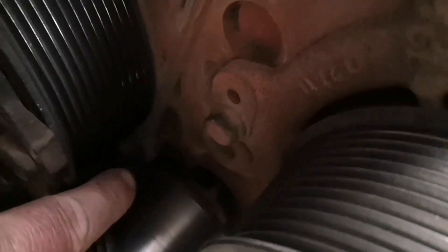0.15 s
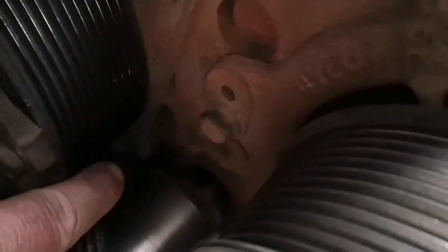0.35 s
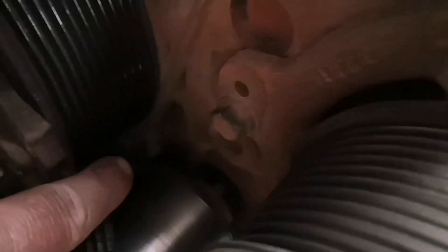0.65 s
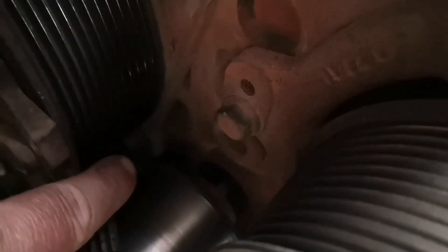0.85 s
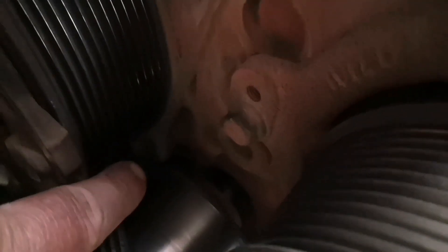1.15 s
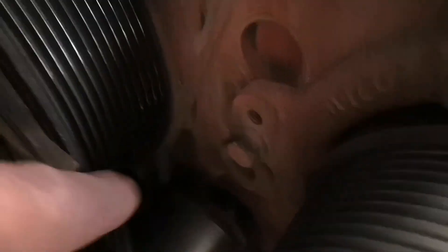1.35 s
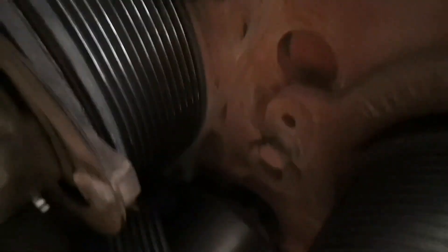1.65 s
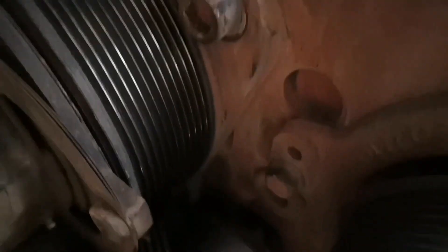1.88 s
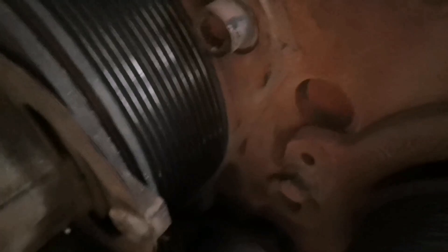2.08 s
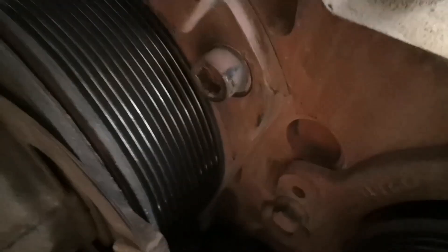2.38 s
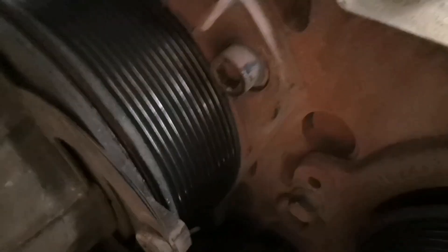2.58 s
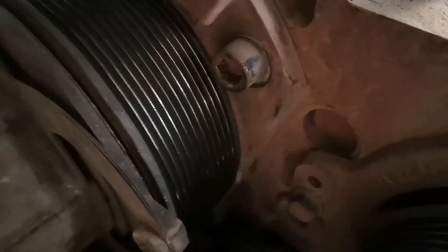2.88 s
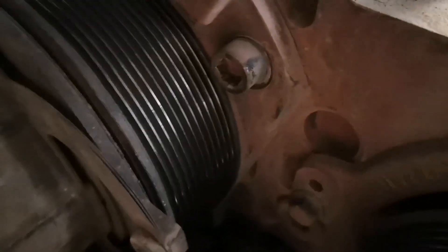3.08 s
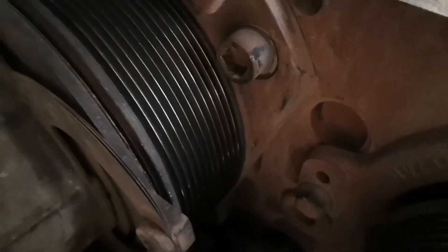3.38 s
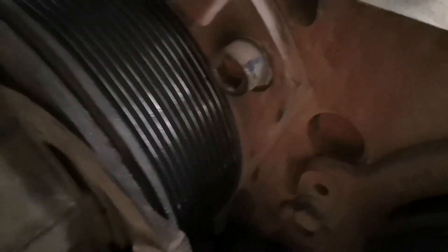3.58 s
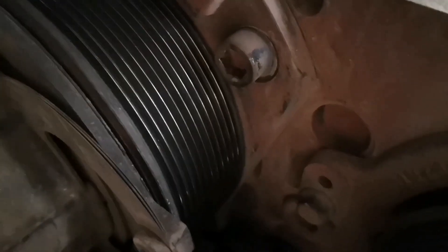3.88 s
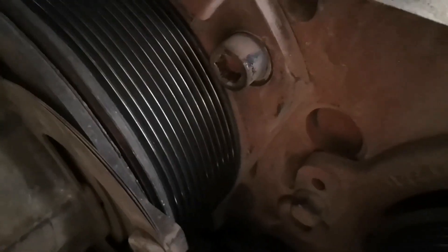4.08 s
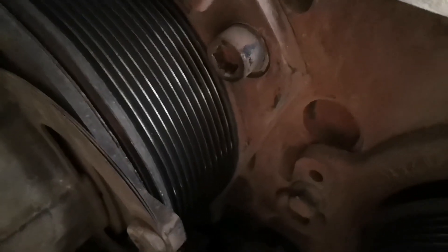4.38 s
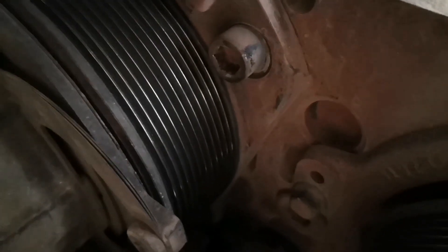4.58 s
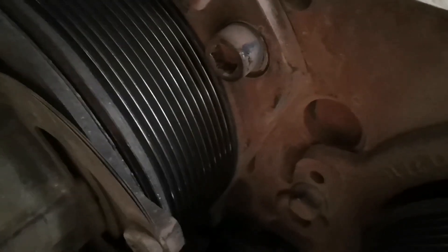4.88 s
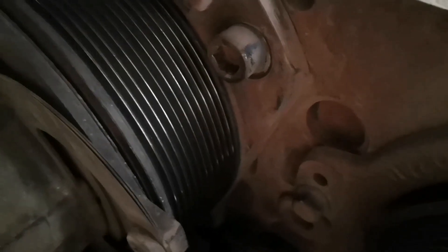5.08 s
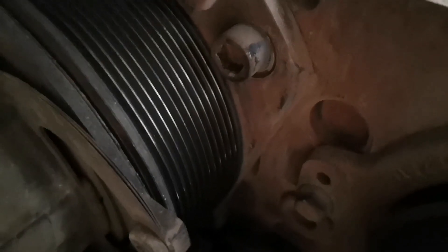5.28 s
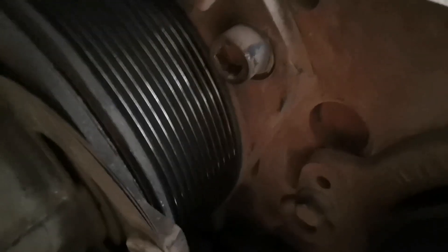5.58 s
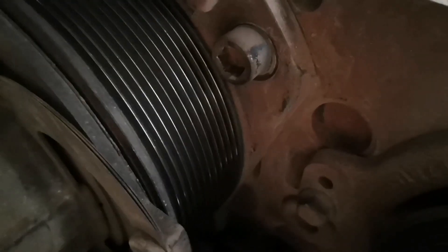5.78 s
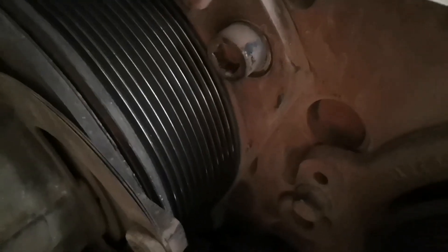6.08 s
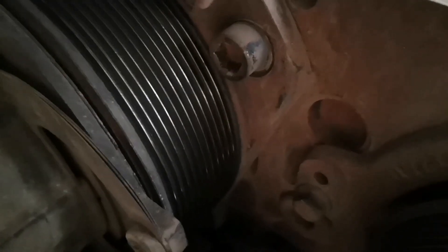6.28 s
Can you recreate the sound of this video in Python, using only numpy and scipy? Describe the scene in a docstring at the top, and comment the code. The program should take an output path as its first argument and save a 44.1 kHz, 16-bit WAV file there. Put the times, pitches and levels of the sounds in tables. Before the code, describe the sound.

Hard steel socket clacks and loose metallic rattles near the right, over low engine hum and wavering road rumble in a workshop.

```python
"""Socket and wrench on engine bolts

A steel socket and wrench, worked by hand close to the right of two microphone ports, clack, rattle and scuff.
Contact forces excite damped modes and a broad crack; band noise gives the dull thuds of the casting.
A hand slides on the metal and rustles as flickering noise; engine bay and shop answer with decaying noise tails.
Wavering tones make the drones and the far engine notes, which glide in pitch and stop after 3.5 s;
coloured noise makes road rumble and air.
"""
import sys
import numpy as np
from scipy import signal
from scipy.fft import rfft, irfft
from scipy.io import wavfile
from scipy.ndimage import uniform_filter1d

SR = 44100
rng = np.random.default_rng(int(sys.argv[2]) if len(sys.argv) > 2 else 0)


def store_pcm(level_fs):
    """Save levels as 16-bit WAV."""
    pcm = np.round(np.clip(level_fs, -1, 1) * 32767).astype(np.int16)
    wavfile.write(sys.argv[1], SR, np.atleast_2d(pcm).T)


def decibels_to_gain(level_db):
    """Convert a level in decibels to a linear amplitude gain (20 dB per decade)."""
    exponent = np.asarray(level_db, float) / 20
    return 10 ** exponent


N = 284134
TIME = np.arange(N) / SR

# Clacks of the socket seating on a bolt, and duller low knocks of the tool:
# [t/s, level/dB, contact colour at 1 kHz/dB, at 3.7 kHz/dB, at 6.5 kHz/dB]
CLACKS = [(0.683, 0, -8.5, -3, -4.5), (0.8042, -26, 9, -11, -36), (1.5439, -9, -6.5, -9, -13.5),
          (2.4243, -9, -9.5, -11, -25.5), (3.906, -3.5, -11, -10.5, -18), (4.8964, -5, -9, -13.5, -16),
          (4.9316, -26, 5, -21, -21), (4.9445, -24.5, 8, -21.5, -26), (5.1234, -35.5, 11, -11, -10.5)]
# Tool rattling in its play: [t/s, level/dB, contact colour at 6.5 kHz/dB, body f/Hz]
TICKS = [(0.051, -25.5, -16.5, 2610), (0.0665, -17.5, -8, 2220), (0.0935, -30.5, -22, 2400),
         (0.116, -36.5, -9, 2290), (0.147, -29, -26, 1740), (0.3645, -26.5, -16.5, 1950),
         (0.8106, -32, -35, 1770), (1.61, -25.5, -26.5, 2120), (1.631, -17, -15.5, 2230),
         (1.6408, -14, -10, 1800), (1.6711, -20, -15.5, 1980), (1.682, -26, -18, 2070),
         (1.731, -21.5, -13, 1790), (1.74, -23, -13, 1740), (1.76, -24, -5, 2280),
         (1.7746, -15.5, -10.5, 2140), (1.8859, -26, -14.5, 1800), (1.8901, -16, -12, 2330),
         (2.2705, -40, -19.5, 2290), (2.9924, -25.5, -11.5, 2930), (3.026, -35, -12, 2160),
         (3.052, -38, -16, 2320), (3.1009, -20, -13, 2040), (3.1342, -18.5, -22, 1750),
         (3.175, -23, -23, 2000), (3.236, -27, -28, 1760), (3.2516, -33, -17, 1790),
         (3.2747, -28.5, -22, 2370), (3.288, -21.5, -10.5, 2780), (3.3036, -26, -8, 2060),
         (3.331, -20, -20.5, 2120), (3.3445, -20, -13.5, 1840), (3.36, -16.5, -6.5, 1850),
         (3.4409, -22.5, -16, 2410), (3.4522, -27, -29, 2330), (3.5017, -35, -14, 2328),
         (3.8357, -11, -7, 1830), (3.862, -20, -22, 1770), (4.0105, -24, -1, 2410),
         (4.0136, -23.5, -12, 2300), (4.0415, -23, -17.5, 1830), (4.0451, -18, -8.5, 2340),
         (4.125, -32, -13, 2380), (4.1341, -32, -12, 2400), (4.1813, -27, -13, 1920),
         (4.2056, -22, -26, 2096), (5.152, -48.5, -13.5, 2164), (5.293, -51, -42, 2326),
         (5.5014, -27, -32, 2280), (5.7471, -26, -8.5, 2390), (5.7604, -26, -17, 1840),
         (5.8304, -15, -6, 2050), (5.9072, -26.5, -17.5, 1980), (5.9202, -24.5, -14, 2220),
         (6.0296, -38, -38, 1800), (6.051, -34, -29, 1826), (6.1567, -16, -8.5, 2110),
         (6.2988, -44, -11, 2610)]
# Short slides of steel on steel: [start t/s, length t/s, level/dB]
SCUFFS = [(0.029, 0.052, -44), (0.346, 0.041, -41), (0.688, 0.024, -55), (0.78, 0.051, -48.5),
          (1.576, 0.13, -37.5), (1.612, 0.021, -48.5), (1.72, 0.076, -41.5), (1.953, 0.081, -56.5),
          (2.542, 0.077, -49), (2.996, 0.064, -48.5), (3.113, 0.02, -43.5), (3.264, .12, -39),
          (3.349, 0.024, -36.5), (3.449, 0.087, -52), (3.791, 0.099, -42), (3.817, 0.042, -35),
          (4.02, 0.057, -40), (4.171, 0.063, -39), (4.913, 0.079, -43), (5.004, 0.061, -59),
          (5.315, 0.051, -46), (5.474, 0.071, -44.5), (5.731, 0.071, -43.5), (5.901, 0.05, -49),
          (6.033, 0.028, -55), (6.142, 0.04, -34.5)]
# Modes of socket, wrench and bolt, undamped by the grip: [f/Hz, level/dB, t60/s, left minus right/dB]
RINGS = [(1040, -16, .03, -3), (1287, -15, .1, 3), (1380, -14, .06, -2), (1518, -12, .04, 0),
         (1782, -5, .04, 2), (1900, -5, .03, -2), (2056, -7, .03, 0), (2180, -4, .035, 3),
         (2320, -10.5, .16, -2), (2480, -1, .02, 0), (2700, 0, .02, 0), (2900, -3, .025, 2),
         (3150, -6, .02, 2), (3375, -4, .045, -2), (3677, -8, .09, 0), (3980, -6, .025, -2),
         (4280, -6, .035, 2), (4452, -8, .035, -2), (4825, -9, .03, 0), (5157, -6, .03, 2),
         (5500, -6, .04, -2), (5695, -7, .035, 0), (6090, -6, .03, 3), (6500, -5, .03, -3),
         (6729, -6, .035, 0), (7200, -5, .03, -3), (7450, -7, .025, 2), (8086, -9, .025, 0),
         (8600, -11, .02, 3), (9400, -12, .02, -2), (11200, -18, .02, 2), (13300, -22, .02, -2)]
# Only the first blow of a clack or knock excites the 3677 Hz mode of the bolt
LOOSE_RINGS = [ring for ring in RINGS if ring[0] != 3677]
# Spectrum of the crack radiated by a contact: [f/Hz, level/dB]
CRACK_COLOUR = [(180, -51.5), (300, -17.5), (631, -22.5), (1510, -11), (1780, -2.5), (3020, -6),
                (3280, -12), (4000, -8), (7250, -7), (14500, -25.5), (15500, -49)]
# Dull thuds of the casting under the tool, flat from f/4 to 1.5 f: [t/s, level before the envelope/dB, f/Hz]
THUDS = [(0.065, -44, 273), (0.362, -47.5, 420), (0.681, -46, 201), (1.542, -43, 161.2), (1.64, -40, 238),
         (1.774, -49, 398), (3.095, -42.5, 416), (3.359, -46, 161), (3.834, -38.5, 427),
         (3.904, -46.5, 710), (4.204, -51.5, 439), (4.896, -42, 229.4), (4.94, -44.5, 156),
         (5.747, -43.5, 686)]
# Hand sliding over the pulley: [start t/s, swell t/s, hold t/s, release t/s, level/dB]
STROKES = [(0.796, 0.134, 0.069, 0.052, -50), (1.114, 0.088, 0.073, 0.35, -46.5)]
# Spectrum of skin dragged over metal: [f/Hz, level/dB]
DRAG_COLOUR = [(71, -43), (120, -5), (235, -3), (306, -13), (662, -13), (846, -13.5), (1690, -11),
               (1950, -5), (3110, -17.5), (3890, -10.5), (4960, -16.5), (5720, -11), (11700, -24.5),
               (14300, -38.5), (15500, -49.5)]
# Spectrum of the rustling grip: [f/Hz, level/dB]
RUSTLE_COLOUR = [(1500, 6), (2300, 8), (3500, -13.5), (5000, -4.5), (7200, -3), (9000, -13.5), (15000, -19)]
# Notes of far engines, one row for each steady pull: [start t/s, end t/s, first f/Hz, last f/Hz, level/dB]
ENGINE_NOTES = [(0, 1.2, 82, 83, -52.5), (1.2, 1.6, 82, 73, -50), (0, 1.7, 63, 68, -60),
                (1.7, 3.55, 68, 79.5, -54.5)]
# Mean course of the road rumble, which swells as traffic passes: [t/s, level/dB]
RUMBLE_COURSE = [(0, -56), (.8, -55), (1.45, -46.5), (1.9, -54), (2.8, -58), (3.7, -58), (4.25, -53),
                 (4.8, -60), (5.7, -57), (6.44, -62.5)]
# Spectrum of the road rumble: [f/Hz, level/dB]
RUMBLE_COLOUR = [(25, -21), (45, -2), (65, 9), (90, 3), (130, -9), (300, -42.5)]
# Steady wavering drones of the shop: [f/Hz, level/dB]
DRONES = [(84, -74.5), (133, -76.5), (151, -70.5)]
# Spectrum of the workshop air: [f/Hz, level/dB]
AIR_COLOUR = [(12, -50.5), (20, -6.5), (103, -11), (144, -7.5), (185, -12), (289, -17), (324, -21),
              (372, -18.5), (705, -27), (811, -22), (1270, -23), (3000, -35), (4190, -38.5), (8640, -58),
              (15500, -67)]
# Response of the left port to near sounds: [f/Hz, level/dB]
LEFT_PORT = [(500, -1), (1200, 0), (4000, 1.5), (7000, -1), (9500, 7)]
# Treble limit of the finished sound: [f/Hz, level/dB]
TREBLE_LIMIT = [(8500, -0.5), (10500, -8), (13000, -8), (15000, -4), (15700, -11.5), (16000, -60.5)]

LEAD = 256  # samples of silence ahead of a contact force, room for the filters' pre-ringing
LEAD_S = LEAD / 2 / SR  # the part of it left ahead of the contact in the finished sound
PORT_LIKENESS = 0.31  # correlation of contact noise between the ports
BODY_BAND_DB, TOP_HZ = -7, 12000
CLACK_PAN_DB, CLACK_CHATTER_MS, CLACK_CHATTER_DB = -7, 2.6, -14.5
CLACK_RING_SHARE = 0.73  # of the free ring time; the grip damps the rest
TICK_CHATTER_DB = -8  # also used for the bounces of a clack


def unit(x):
    """Normalization: scale to rms 1."""
    return x / np.sqrt(np.mean(x ** 2))


def colour(x, points):
    """Linear filtering: weight the spectrum by [f/Hz, level/dB] points, interpolated over log frequency."""
    hz, db = np.transpose(points)
    f = np.fft.rfftfreq(x.shape[-1], 1 / SR) + 1
    gain = decibels_to_gain(np.interp(np.log(f), np.log(hz), db))
    return irfft(rfft(x) * gain, x.shape[-1])


def walk(rate):
    """Slow random modulation: levels held for 1 / rate s and smoothed twice, with a spread near 1."""
    k = int(SR / rate)
    held = np.repeat(rng.standard_normal(N // k + 1), k)
    return uniform_filter1d(uniform_filter1d(held, k), k)[:N] * 4 / 3


def port_noise(size, likeness):
    """Partial coherence: two noises built from a common and an opposed part."""
    mid, side = rng.standard_normal((2, size))
    opposed = side * np.array([[1], [-1]])
    return np.sqrt(1 + likeness) * mid + np.sqrt(1 - likeness) * opposed


def pan(db):
    """Level difference between ports: left and right gains whose mean is 1; negative dB lies to the right."""
    left = decibels_to_gain(db)
    return np.array([2 * left / (1 + left), 2 / (1 + left)])


def add(track, sound, s):
    """Superposition: mix a sound into the track at time s."""
    i = int(s * SR)
    track[:, i:i + sound.shape[1]] += sound[:, :N - i]


def air():
    """Diffuse field: workshop air is alike at both ports in the bass and unrelated in the treble."""
    mid, side = colour(rng.standard_normal((2, N)), AIR_COLOUR)
    side = colour(side, [(60, -18.5), (125, -10.5), (250, -7.5), (600, 1.5)])
    level = decibels_to_gain(-59.5 + 1.0 * walk(3.1))
    return level * (mid + side * np.array([[1], [-1]])) / np.std(mid)


def rumble():
    """Low-pass noise: road rumble follows the passing traffic with a random sway of level."""
    level_db = np.interp(TIME, *np.transpose(RUMBLE_COURSE)) + 3.6 * walk(7)
    return unit(colour(rng.standard_normal(N), RUMBLE_COLOUR)) * decibels_to_gain(level_db)


def wavering(hz, steady):
    """Narrow-band modulation: a carrier plus slow random quadratures sways in strength and phase."""
    width_hz = 3.9
    points = [(width_hz / 2, 0), (width_hz, -12), (4 * width_hz, -50)]
    sway = colour(rng.standard_normal((2, N)), points)
    turn = np.exp(2j * np.pi * np.cumsum(hz + 0 * TIME) / SR)
    strength = steady + unit(sway[0]) + 1j * unit(sway[1])
    return unit(np.real(strength * turn))


def drones():
    """Steady hum: the shop's own drones are wavering tones of constant frequency."""
    return sum(decibels_to_gain(db) * wavering(hz, 3.1) for hz, db in DRONES)


def engine_notes():
    """Gliding frequency: each far engine note slides between two pitches, with 0.1 s ramps at its ends."""
    out = np.zeros(N)
    for start, end, first_hz, last_hz, db in ENGINE_NOTES:
        sounding = 1.0 * ((TIME >= start) & (TIME < end))
        ramp = uniform_filter1d(sounding, SR // 10)
        hz = np.interp(TIME, [start, end], [first_hz, last_hz])
        out += wavering(hz, 7.4) * decibels_to_gain(db) * ramp
    return out


def swell(t, ramp_s):
    """Smooth onset: a squared sine rises from 0 to 1."""
    return np.sin(np.pi / 2 * np.clip(t / ramp_s, 0, 1)) ** 2


def hand_drag():
    """Friction noise: skin drags over metal in a fine flickering grain under a swelling pressure."""
    press = np.zeros(N)
    for s, up, hold, down, db in STROKES:
        press += decibels_to_gain(db) * swell(TIME - s, up) * swell(s + up + hold + down - TIME, down)
    grain = decibels_to_gain(2.0 * walk(90) + 2.0 * walk(11.83))
    return unit(colour(port_noise(N, 0.12), DRAG_COLOUR)) * press * pan(3.5)[:, None] * grain


def grip_rustle():
    """Relaxation: the grip rustles at rest, more at each rattle, and settles exponentially after it."""
    rest_db, stir_db, settle_s = -68.5, -71.5, 0.077
    rustle = unit(colour(port_noise(N, 0.46), RUSTLE_COLOUR)) * pan(-1)[:, None]
    stir = sum(np.exp(-np.maximum(TIME - s, 0) / settle_s) * (TIME > s) for s, *_ in TICKS)
    flicker = decibels_to_gain(3.0 * walk(37) + 3.8 * walk(4.5))
    return rustle * (decibels_to_gain(rest_db) + decibels_to_gain(stir_db) * stir) * flicker


def thuds():
    """Heavy damping: casting and the palm behind the tool give short low pushes that decay at once."""
    track = np.zeros((2, N))
    t_ms = np.arange(SR // 4) / SR * 1000
    envelope = (1 - np.exp(-t_ms / 0.83)) * np.exp(-t_ms / 30)
    for s, db, hz in THUDS:
        # steep lower edge at hz / 4
        points = [(hz / 4.001, -24), (hz / 4, 0), (hz * 1.5, 0), (hz * 4, -14), (hz * 16, -60)]
        push = unit(colour(port_noise(len(t_ms), 1.0), points))
        add(track, decibels_to_gain(db) * push * envelope, s)
    return track


def ringing(size, free, table):
    """Modal response: damped modes with new strengths and signs, in a fixed left-right balance for each mode."""
    hz, db, t60, side_db = np.transpose(table)[:, :, None]
    strength, detune, sign = rng.standard_normal((3, len(table), 1))
    t = np.arange(size) / SR
    level_db = db + 1.5 * strength - 60 * t / (t60 * free)
    modes = decibels_to_gain(level_db) * np.sin(2 * np.pi * hz * (1 + 0.003 * detune) * t) * np.sign(sign)
    left = np.sum(modes * decibels_to_gain(side_db / 2), axis=0)
    right = np.sum(modes * decibels_to_gain(-side_db / 2), axis=0)
    return np.array([left, right])


def steel(force, points, free, table):
    """Forced vibration: a contact force, convolved with the modes, also radiates a broad crack."""
    size = force.shape[1]
    force = np.pad(force, ((0, 0), (LEAD, 0)))
    rings = signal.fftconvolve(force, ringing(size, free, table), axes=1)[:, :size + LEAD]
    crack = unit(colour(force, CRACK_COLOUR))
    sound = unit(rings) + decibels_to_gain(-0.5) * crack
    return colour(sound, points)[:, LEAD // 2:-LEAD]


def blow(level_db, points, pan_db, chatter_ms, chatter_db, free, table):
    """Impact: the faces meet in one sharp push, then chatter in decaying noise for a few milliseconds."""
    t_ms = np.arange(SR // 4) / SR * 1000
    force = decibels_to_gain(chatter_db) * port_noise(len(t_ms), PORT_LIKENESS) * np.exp(-t_ms / chatter_ms)
    force[:, 0] += 1
    sound = steel(force, points, free, table)
    # the level sets the power of the loudest 64 samples
    loudest = uniform_filter1d(np.sum(sound ** 2, axis=0), size=64).max()
    return sound * decibels_to_gain(level_db) / np.sqrt(2 * loudest) * pan(pan_db)[:, None]


def scuffs():
    """Friction: rough sliding faces catch unevenly, so a gritty force drives the steel."""
    track = np.zeros((2, N))
    t = np.arange(SR // 3) / SR
    treble_db = -4
    points = [(300, -6), (1000, -14), (2200, 0), (3700, -6), (5600, treble_db + 1.0),
              (6500, treble_db), (TOP_HZ, treble_db - 2.0)]
    for s, length, db in SCUFFS:
        grit_db = 4.5 * rng.standard_normal(len(t) // 64 + 1)
        grit = decibels_to_gain(grit_db.repeat(64)[:len(t)])
        slide = np.sin(np.pi * np.clip(t / length, 0, 1))
        force = port_noise(len(t), PORT_LIKENESS) * grit * slide
        sound = unit(steel(force, points, free=0.8, table=LOOSE_RINGS))
        sound = sound * np.sqrt(2 * length / t[-1]) / 2  # refer the rms to the length of the slide
        add(track, decibels_to_gain(db) * sound * pan(-7.5)[:, None], s)
    return track


def rattles():
    """Repeated light impact: the tool strikes within its play, each time with another left-right balance."""
    track = np.zeros((2, N))
    low_db, mid_db, top_db = -20.5, -26, -8.5
    for s, db, high, body_hz in TICKS:
        points = [(700, low_db + 7.0), (1350, low_db), (1620, BODY_BAND_DB - 10.5), (body_hz, BODY_BAND_DB),
                  (3700, mid_db), (5600, high + 1.0), (6500, high), (9000, high - 2.5), (TOP_HZ, high + top_db)]
        pan_db = -9.5 + 3 * rng.standard_normal()
        sound = blow(db, points, pan_db, 2.5, TICK_CHATTER_DB, free=1, table=LOOSE_RINGS)
        add(track, sound, s - LEAD_S)
    return track


def clack_colour(low, mid, high):
    """Contact spectrum: the band levels of a clack or knock as [f/Hz, level/dB] points."""
    return [(400, low - 8.0), (1000, low), (1800, BODY_BAND_DB - 1.0), (2400, BODY_BAND_DB + 1.5),
            (3700, mid), (6500, high), (8500, high - 3.0), (TOP_HZ, high - 16)]


def clacks():
    """Impact and rebound: a hard clack or low knock of the tool is followed by duller, weaker bounces."""
    track = np.zeros((2, N))
    bounce_gap_s, bounce_db, bounce_step_db, bounce_low_db = 0.011, -22, -5, 19
    for s, db, low, mid, high in CLACKS:
        first = blow(db, clack_colour(low, mid, high), CLACK_PAN_DB, CLACK_CHATTER_MS,
                     CLACK_CHATTER_DB, CLACK_RING_SHARE, RINGS)
        add(track, first, s - LEAD_S)
        gaps = bounce_gap_s * (0.5 + rng.random(size=3))
        for k, late in enumerate(np.cumsum(gaps)):
            bounce = blow(db + bounce_db + k * bounce_step_db, clack_colour(low + bounce_low_db, mid, high),
                          CLACK_PAN_DB, CLACK_CHATTER_MS, TICK_CHATTER_DB, CLACK_RING_SHARE, LOOSE_RINGS)
            add(track, bounce, s + late)
    return track


def echoes(x, t60, points):
    """Reverberation: convolve with a dense, exponentially decaying tail, another one for each port."""
    t = np.arange(int(t60 * SR)) / SR
    tail = colour(rng.standard_normal((2, len(t))), points) * decibels_to_gain(-60 * t / t60)
    tail = tail / np.sqrt(np.sum(tail ** 2, axis=1, keepdims=True))
    return signal.fftconvolve(x.mean(axis=0, keepdims=True), tail, axes=1)[:, :N]


def delayed(x, lag_ms):
    """Travel time: a linear phase shift delays the sound, also by fractions of a sample."""
    lag = lag_ms * SR / 1000
    return irfft(rfft(x) * np.exp(-2j * np.pi * np.fft.rfftfreq(N) * lag), N)


def scene():
    """Superposition: near sounds reach the left port late; engine bay and shop add their echoes."""
    near = clacks() + rattles() + scuffs() + thuds() + hand_drag() + grip_rustle()
    left = delayed(colour(near[0], LEFT_PORT), lag_ms=0.5678)
    bay = decibels_to_gain(-9) * echoes(near, 0.043, [(300, -13.0), (900, 3.5), (4000, -7.5), (12000, -10.0)])
    shop = decibels_to_gain(-21) * echoes(near, 0.31, [(200, -17.5), (700, -0.5), (3000, -15), (10000, -10.5)])
    hum = rumble() + engine_notes() + drones()
    return np.array([left, near[1]]) + bay + shop + hum + air()


def band_limit(x):
    """A steep low-pass at the top of the band."""
    return signal.sosfilt(signal.butter(12, 15710, fs=SR, output="sos"), x)


def record(dry):
    """Saturation and band limiting: loud peaks are rounded and the treble is limited."""
    headroom = 0.94  # of full scale
    rounded = dry / (1 + (dry / headroom) ** 6) ** (1 / 6)
    return band_limit(colour(rounded, TREBLE_LIMIT))


dry = scene()
out = record(dry)
store_pcm(out)
```